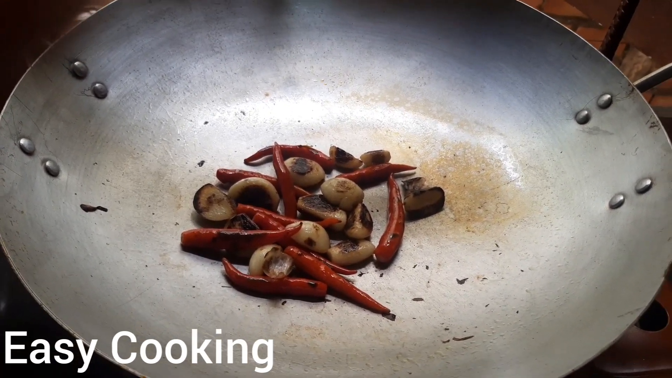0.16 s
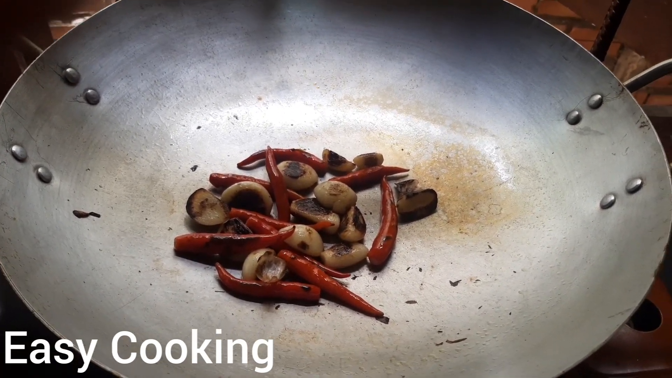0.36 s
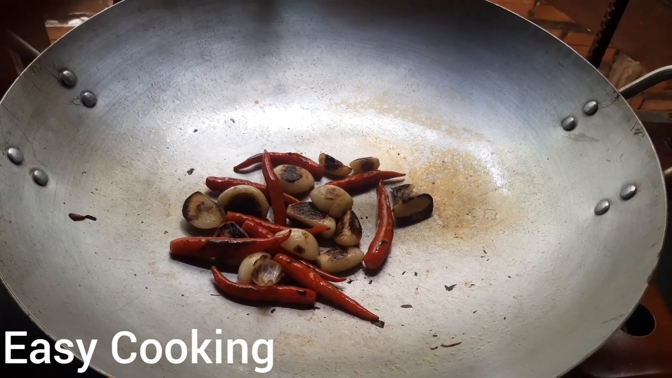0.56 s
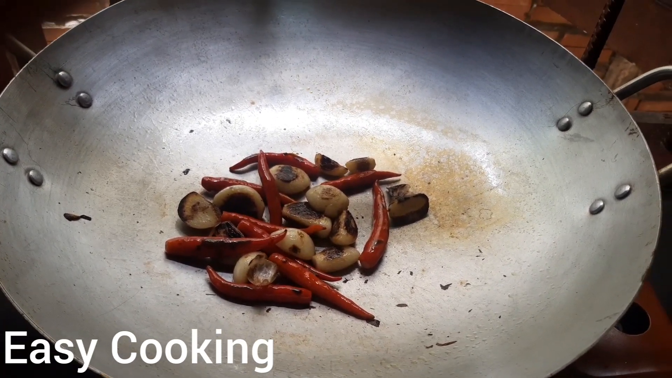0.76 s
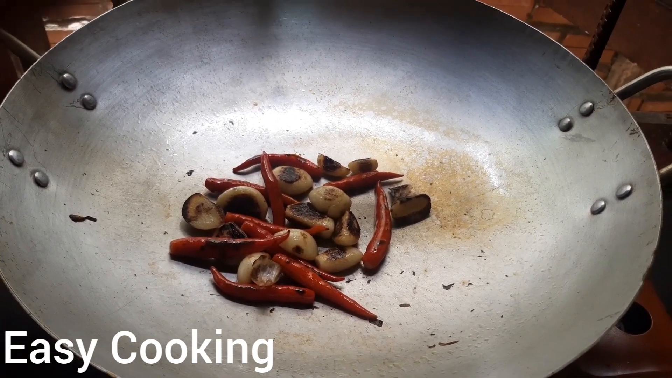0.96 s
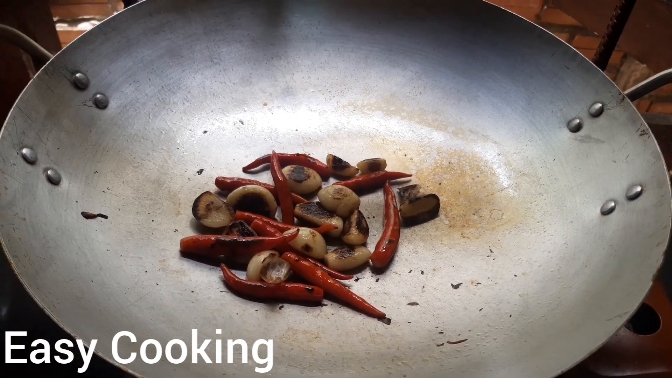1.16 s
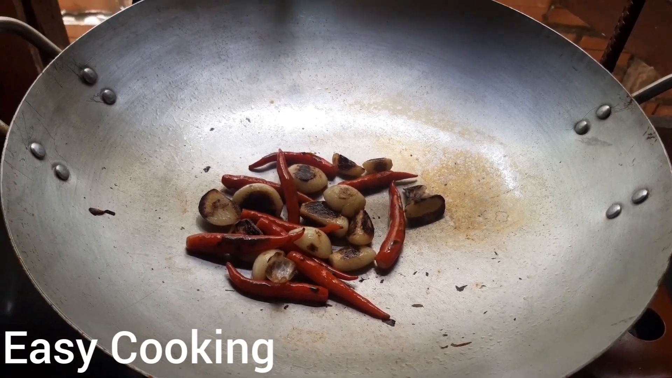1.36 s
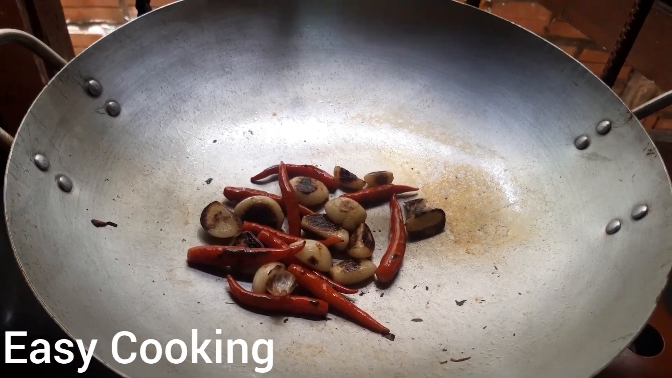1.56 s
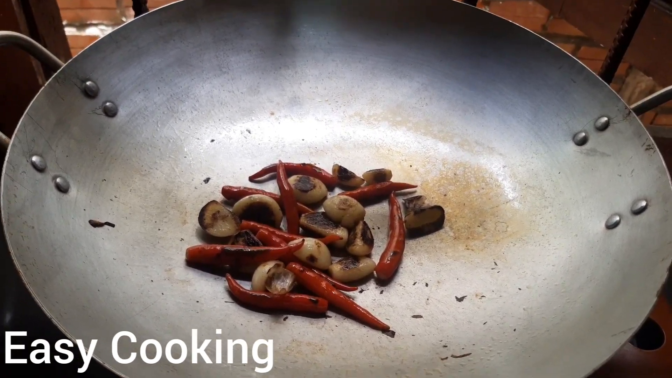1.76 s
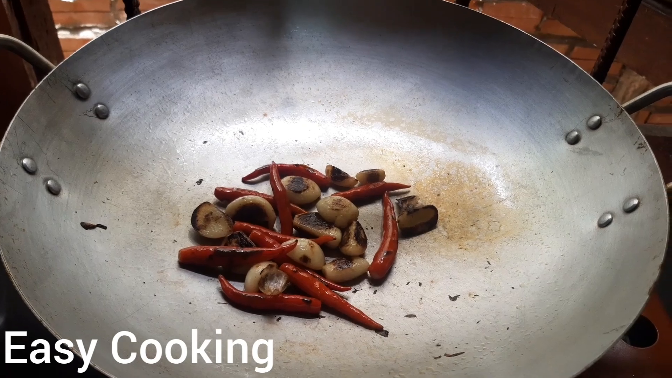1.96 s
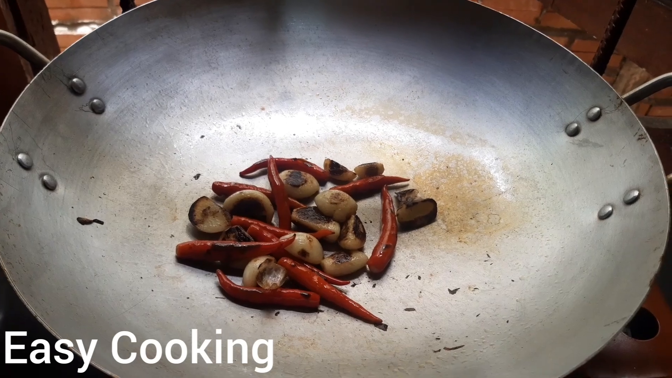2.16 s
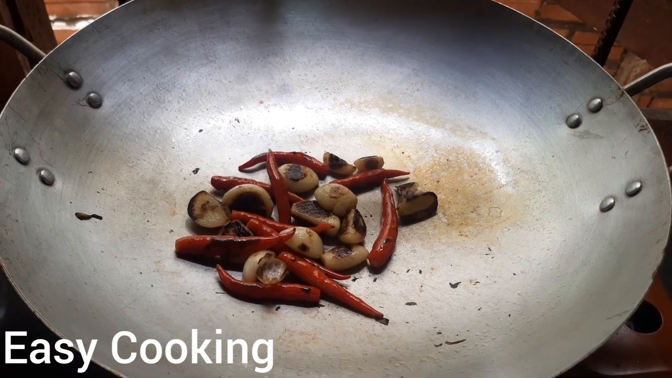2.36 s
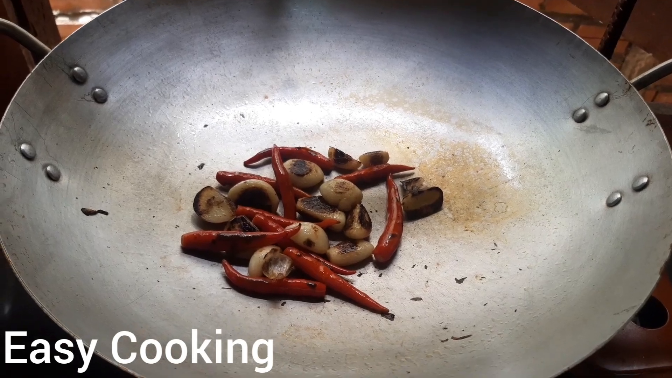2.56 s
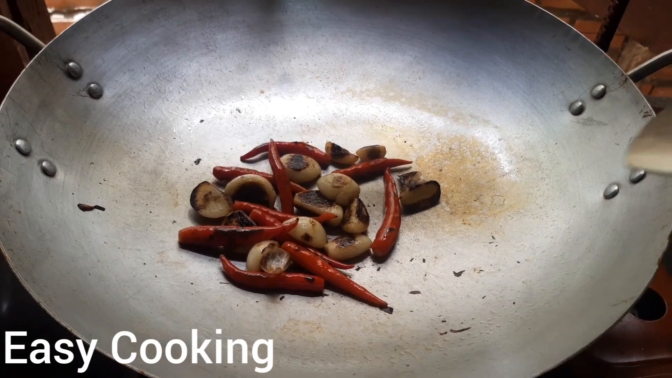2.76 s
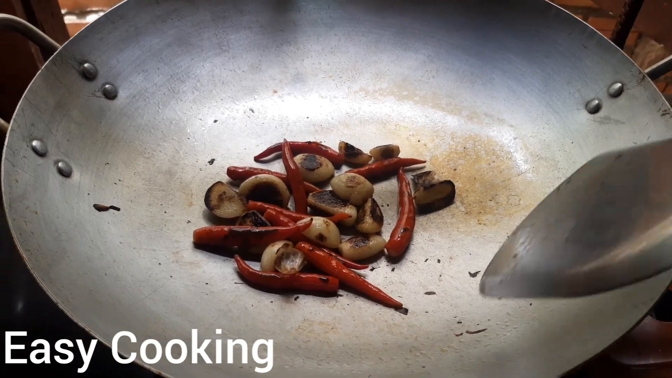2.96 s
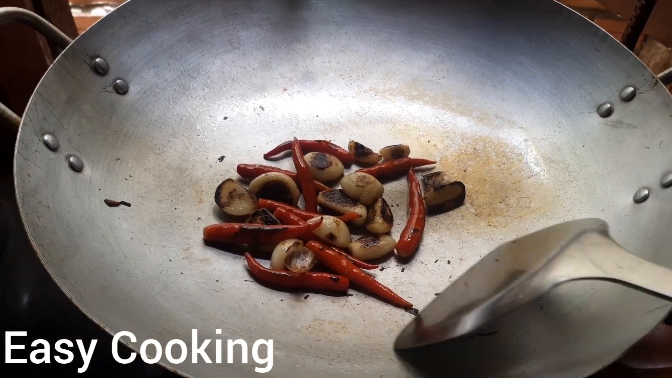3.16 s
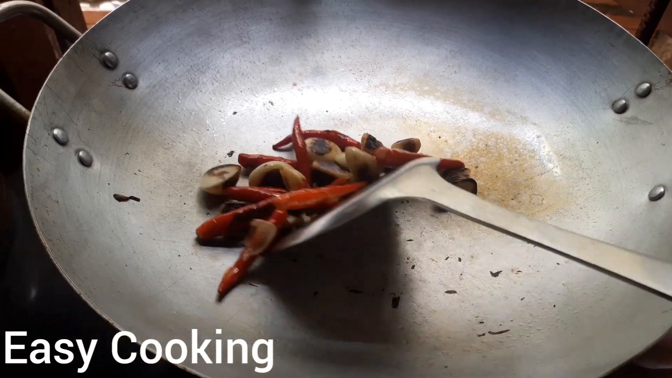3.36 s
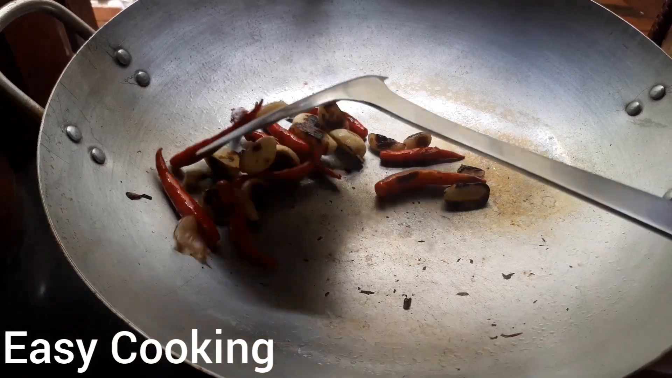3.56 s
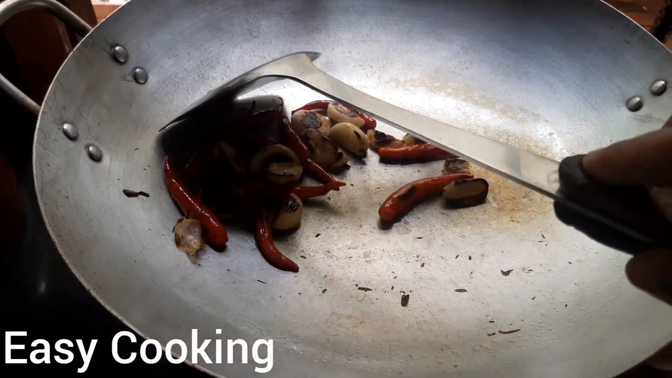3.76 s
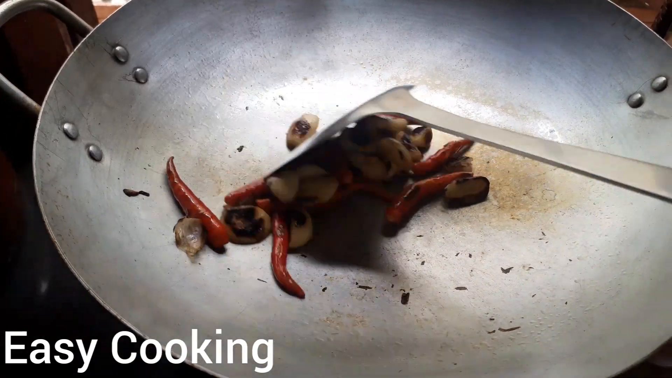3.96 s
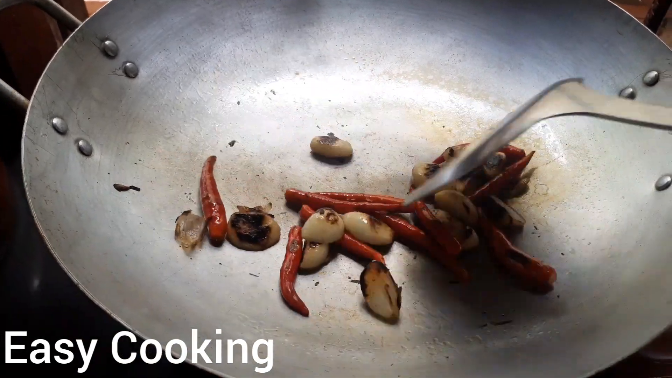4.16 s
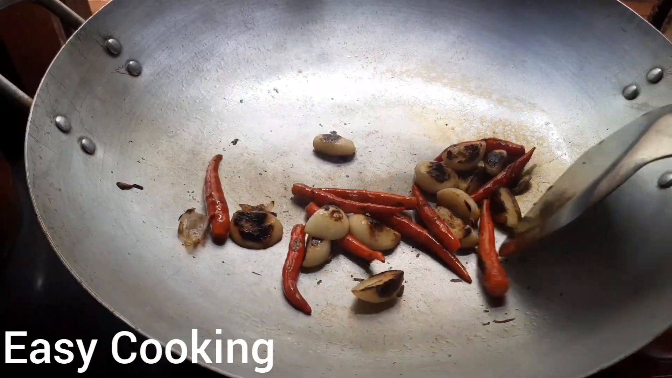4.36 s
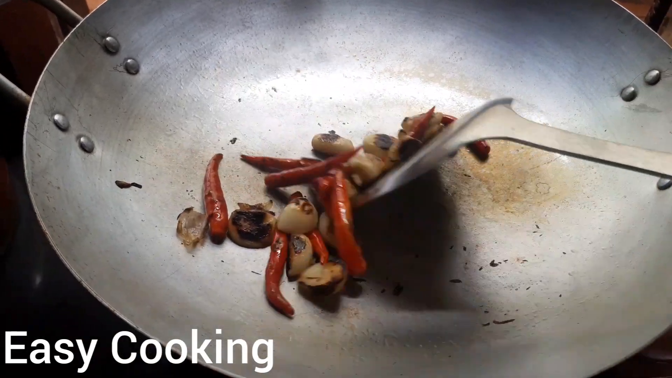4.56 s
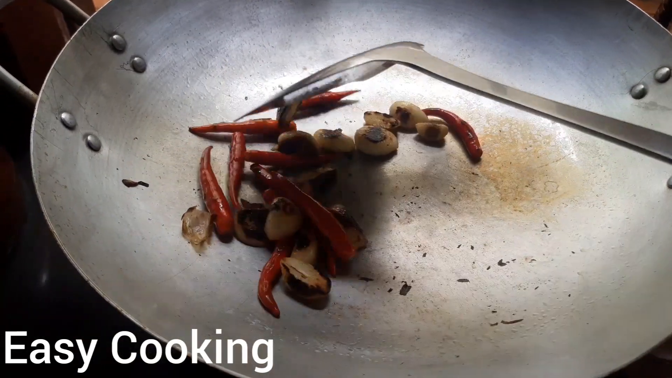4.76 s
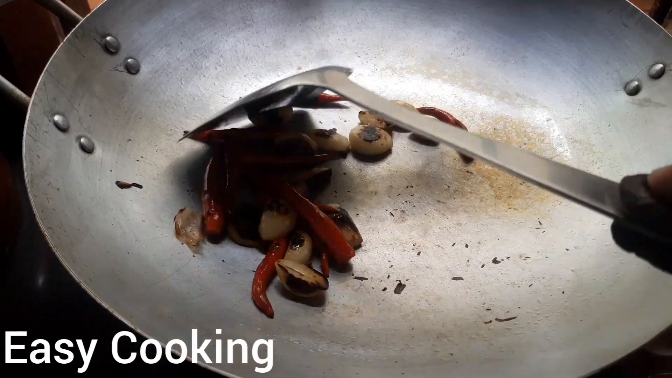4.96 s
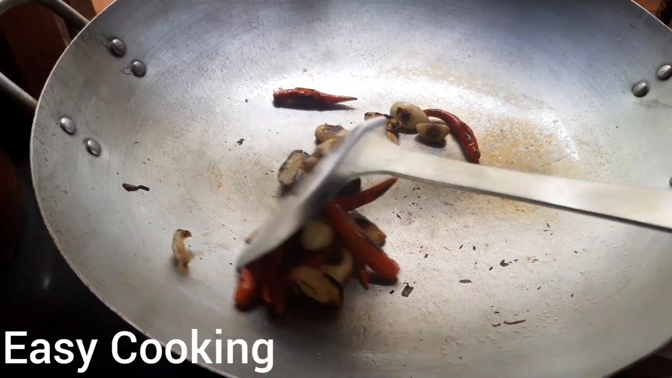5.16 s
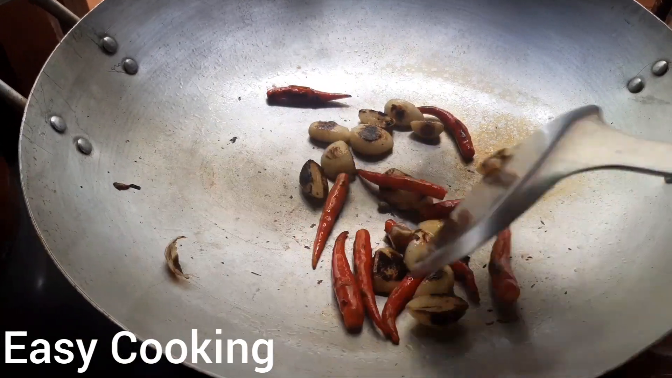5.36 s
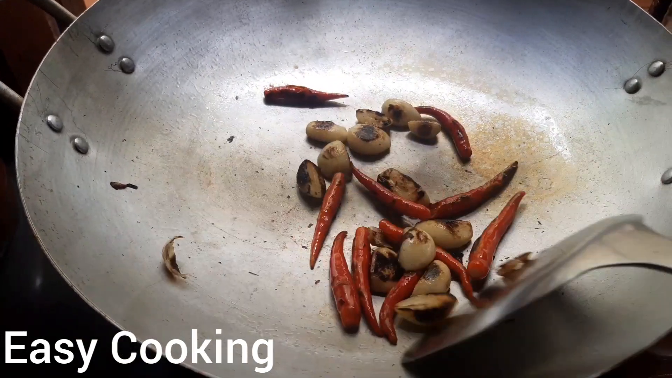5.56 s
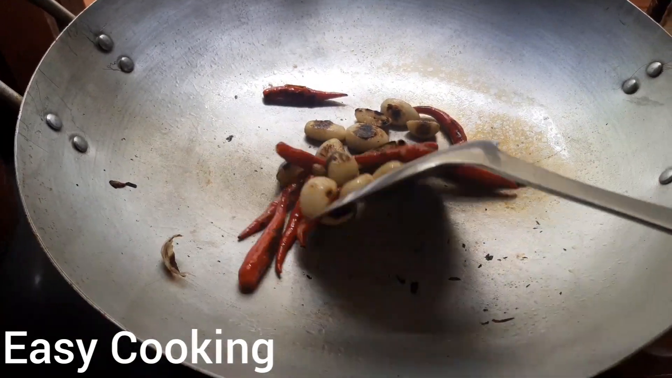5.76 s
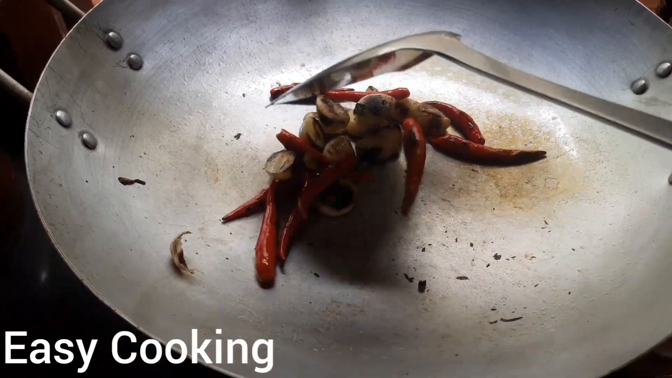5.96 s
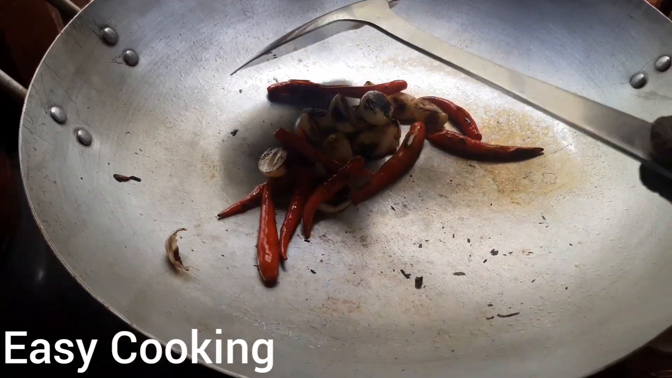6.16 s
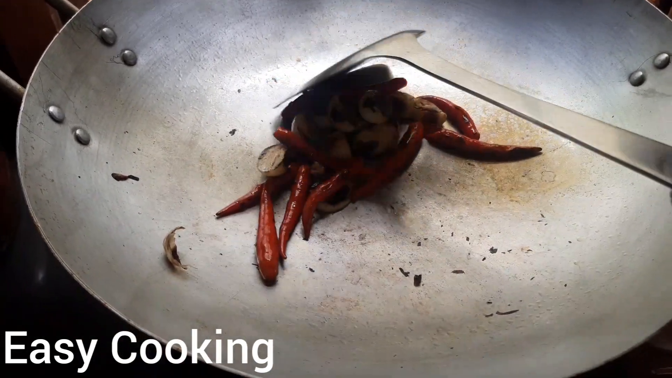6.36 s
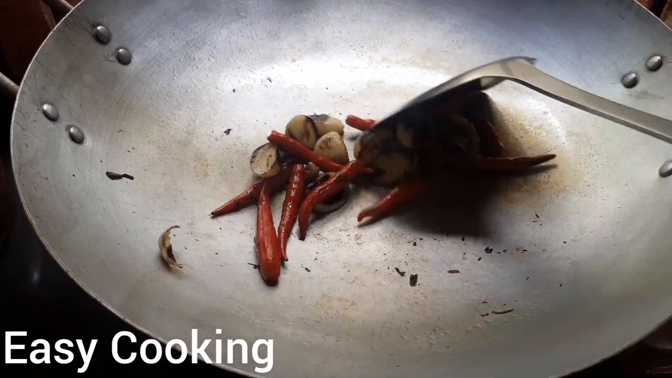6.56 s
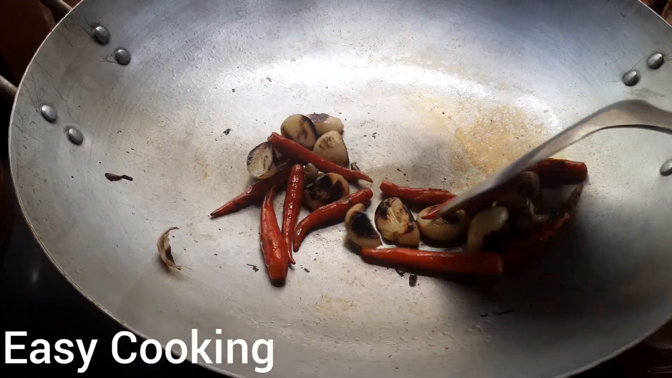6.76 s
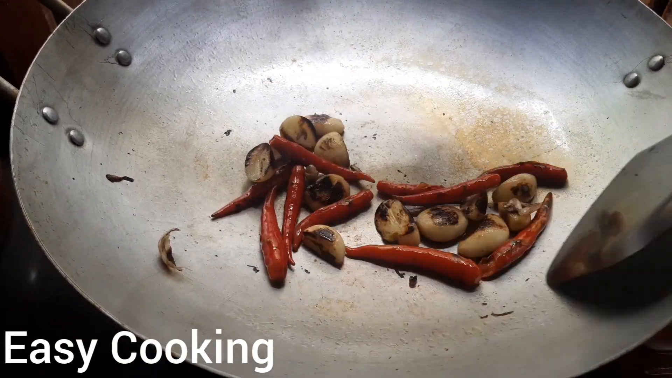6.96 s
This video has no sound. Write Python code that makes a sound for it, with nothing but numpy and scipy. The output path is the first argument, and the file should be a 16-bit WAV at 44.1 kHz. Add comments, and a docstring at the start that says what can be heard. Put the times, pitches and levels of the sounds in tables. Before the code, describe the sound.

In a small kitchen, a quiet pan spits sharply before a metal spatula clangs and rasps through sizzling, softly tumbling food.

```python
"""A metal spatula works in a nearly dry steel wok where chillies and garlic fry, in a small kitchen.
At first the pan only spits now and then (sharp snaps with a fizz) and a utensil clacks (damped modes).
Then the spatula knocks (ringing bowl and steel modes), scrapes (slip clicks through those modes) and
turns the food, which tumbles (soft taps) and sizzles on fresh hot metal (dense random pops).
Faint below: rumble, crackle, a hum that sets in and a distant whir (filtered noise, sines)."""
import sys
import numpy as np
from scipy import signal
from scipy.fft import rfft, irfft
from scipy.io import wavfile

SR = 44100
rng = np.random.default_rng(int(sys.argv[2]) if len(sys.argv) > 2 else 0)


def persist_wave(psi):
    """Save psi, clipped to +-1, as 16-bit WAV."""
    counts = np.round(np.clip(psi, -1, 1) * 32767).astype(np.int16)
    wavfile.write(sys.argv[1], SR, np.atleast_2d(counts).T)


N = 308700
TIME = np.arange(N) / SR
RING_TIME = TIME[:SR // 2]
RING_SIZE = len(RING_TIME)

# slow bending modes of the bowl: f/Hz, level/dB, t60/s
BOWL_MODES = [(235.4, -14.5, 0.63), (285.3, -10.5, 0.32), (379, -43, 0.13), (437.2, -10.5, 0.51),
              (491, -5, 0.081), (543.6, -3, 0.3), (559, -8.5, 0.34), (699.3, 0.5, 0.093), (773.5, -5, 0.14),
              (807, -19, 0.12), (922, -14, 0.45), (1070, -31, 0.16)]
# spectrum of tiny bursts on hot steel: f/Hz, density/dB per Hz
FIZZ_SPECTRUM = [(200, -13.5), (600, -7.5), (1500, -6.5), (3000, -3), (5000, -4.5), (8000, -1.5),
                 (10000, -0.5), (13000, 2.5), (16000, -1)]
# blade pushed along the steel: start/s, length/s, friction drive/dB, swell over stroke/dB,
# blade resonance at mid-stroke/Hz, drive of food shoved along/dB
STROKES = [(3.063, 0.19, -29, 5, 2950, -32.5), (3.242, 0.071, -22.5, 0, 2770, -28),
           (3.584, 0.033, -32, -3, 2870, -44), (3.86, .15, -30.5, 3.5, 2800, -29),
           (4.17, .08, -30, -1, 2600, -35), (4.298, .1, -40.5, 11, 2700, -40),
           (4.449, .16, -27, -5.5, 2620, -32), (4.92, 0.14, -44, 1, 2620, -60),
           (5.167, 0.065, -38.5, 7, 2680, -42.5), (5.57, 0.058, -31.5, -0.5, 2500, -35.5),
           (5.674, 0.051, -26.5, 2, 2600, -36), (5.926, 0.033, -36, -1, 2900, -40),
           (6.332, 0.12, -34, -1.5, 2850, -32), (6.554, .08, -32.5, -7, 2720, -35),
           (6.803, 0.076, -37, 3, 2750, -49), (6.95, .06, -39, -3, 2740, -29)]
# moist food turned onto hot steel: start/s, spreading time/s, sizzle/dB, time to dry by 20 dB/s,
# tilt/dB (added to the finest fizz, taken from the rest)
TURNS = [(3.1, 0.074, -30, .4, -3), (3.24, 0.036, -28.5, 0.18, 4), (3.43, 0.025, -31.5, 0.56, -2.5),
         (3.549, 0.03, -20, 0.09, -0.5), (3.85, 0.037, -34, 1, -1), (3.915, 0.029, -21.5, 0.64, -1),
         (4.039, 0.028, -20.5, 0.56, -1.5), (4.14, 0.078, -16, 0.23, 0.5), (4.29, 0.056, -25.5, 1.1, -1),
         (4.451, 0.024, -20, 0.45, 3.5), (4.53, 0.032, -21.5, 0.22, 0.5), (4.84, .08, -39, 7, 0),
         (5.08, 0.024, -23, 0.2, -0.5), (5.19, 0.045, -26.5, 0.53, -3), (5.309, 0.043, -20.5, 0.07, -1),
         (5.57, 0.054, -31.5, .5, 1), (5.66, 0.046, -25.5, 0.38, -1.5), (5.909, 0.016, -29.5, .4, 0),
         (6.33, 0.058, -33.5, 0.54, -3.5), (6.539, 0.022, -25, 0.46, 0), (6.789, 0.054, -24.5, 0.3, 0),
         (6.93, .06, -30, .4, -2)]


def from_db(db):
    """Decibels to gain."""
    return 10 ** (np.asarray(db) / 20)


def rms_one(x):
    """Scale to unit power."""
    return x / np.sqrt(np.mean(x ** 2) + 1e-20)


def attack_one(x):
    """Scale a ring to unit power over its first 20 ms."""
    return x / np.sqrt(np.mean(x[..., :SR // 50] ** 2))


def energy_one(x):
    """Scale a ring so that it passes white noise at equal power."""
    return x / np.sqrt(np.mean(np.sum(x ** 2, axis=-1)))


def dying(t60_s):
    """Exponential decay, 60 dB in t60_s."""
    return from_db(-60 * RING_TIME / t60_s)


def pan(left_db):
    """Channel gains for a left-minus-right level."""
    return from_db(np.array([[.5], [-.5]]) * left_db)


def cut(x, hz, kind):
    """Second-order low- or high-pass."""
    sos = signal.butter(2, hz, kind, fs=SR, output="sos")
    return signal.sosfilt(sos, x + 1e-18)


def colour(x, spectrum):
    """Weight a signal by a spectrum, interpolated in dB over log frequency; high-pass below it."""
    hz, db = np.transpose(spectrum)
    size = x.shape[-1]
    bins_hz = np.fft.rfftfreq(size, 1 / SR) + 1  # +1 avoids log(0)
    gain = from_db(np.interp(np.log(bins_hz), np.log(hz), db))
    return cut(irfft(rfft(x) * gain, size), hz[0] / 2, "high")


def drift(rate_hz):
    """Interpolated random values, rate_hz new ones per second, unit power."""
    return rms_one(np.interp(TIME * rate_hz, np.arange(N), rng.standard_normal(N)))


def stereo_noise(size, alike):
    """White noise; the channels share the fraction alike of their power."""
    white = rng.standard_normal((3, size))
    return np.sqrt(alike) * white[0] + np.sqrt(1 - alike) * white[1:]


def grains(per_s, spread_db):
    """Random clicks of unequal size and random sign, unit power."""
    sizes = from_db(spread_db * np.minimum(rng.exponential(1, N), 5))
    signs = rng.choice([-1, 1], N)
    return rms_one(sizes * signs * (rng.random(N) < per_s / SR))


def through(x, response):
    """Convolve an excitation with a stereo response."""
    return signal.fftconvolve(np.atleast_2d(x), response, axes=-1)[:, :N]


def add(out, s, sound):
    """Mix a sound in at a time."""
    at = round(s * SR)
    out[:, at:at + sound.shape[-1]] += sound[:, :max(N - at, 0)]


def modes(table, scatter_rad, vary_db, detune):
    """Decaying sines; pitch varies per mode, strength and phase per mode and channel."""
    out = 0
    for hz, db, t60_s in table:
        gain = from_db(db + vary_db * rng.standard_normal((2, 1)))
        shifted_hz = hz * (1 + detune * rng.standard_normal())
        phase = scatter_rad * rng.standard_normal((2, 1))
        out = out + gain * dying(t60_s) * np.sin(2 * np.pi * shifted_hz * RING_TIME + phase)
    return out


def summed_db(envelopes, levels_db):
    """Level of overlapping sounds, whose powers add."""
    power = sum((from_db(db) * envelope) ** 2 for envelope, db in zip(envelopes, levels_db))
    return 10 * np.log10(power + 1e-12)


def whir():
    """Faint distant whir: narrow noise shifted to a gliding pitch, with airy hiss above it."""
    # t/s, f/Hz, level/dB (before the tone and hiss gains)
    glide = [(1.4, 840, -60.5), (2.1, 874, -56), (2.42, 910, -58), (2.55, 950, -52), (2.69, 1030, -51),
             (2.77, 1000, -50), (2.86, 990, -53.5), (3.05, 875, -52.5), (3.4, 870, -85)]
    s, hz, db = np.transpose(glide)
    turn = np.exp(2j * np.pi * np.cumsum(np.interp(TIME, s, hz)) / SR)
    tone = rms_one((cut(stereo_noise(N, 0.25) / turn, 37, "low") * turn).real)
    hiss = cut(stereo_noise(N, 0.086), 2700, "high")
    hiss = rms_one(cut(cut(hiss, 2600, "low"), 3100, "low"))
    mix = from_db(-4.0) * tone * pan(-1.5) + from_db(-3) * hiss
    return mix * from_db(np.interp(TIME, s, db))


def background():
    """Coloured noise for air and low rumble, sparse clicks for steady faint frying, a hum, a whir."""
    # room noise: f/Hz, density/dB per Hz
    kitchen = [(15, -49), (25, -52), (53, 0.5), (92, -3.5), (153, -5.5), (217, -9.5), (317, -8), (489, -19),
               (545, -9.5), (887, -13.5), (1440, -23.5), (2280, -17.5), (3520, -22), (13200, -19),
               (16000, -17)]
    # low hum partials: f/Hz, level/dB
    hum_partials = [(156, -60), (312, -65)]
    hum_start_s = 2.02
    air = cut(rms_one(colour(stereo_noise(N, 0.097), kitchen)), 840, "high")
    rumble = cut(rms_one(colour(stereo_noise(N, 0.79), kitchen)), 1100, "low")
    clicks = np.array([grains(per_s=150, spread_db=-0.5) for side in range(2)])
    crackle = cut(clicks, 2200, "high")
    hum = sum(from_db(db + 2 * drift(8)) * np.sin(2 * np.pi * hz * TIME) for hz, db in hum_partials)
    hum = hum * np.clip((TIME - hum_start_s) * 100, 0, 1)  # sets in over 10 ms
    low = (from_db(-50.5) * rumble + hum) * pan(-7.0)
    return from_db(-47.5) * air * pan(-1.3) + low + from_db(-62) * crackle + whir()


def fizz_burst(t60_s):
    """A bright, grainy noise burst that dies quickly."""
    grit = from_db(6.5 * np.clip(rng.standard_normal(RING_SIZE), -2, 2))
    gritty = stereo_noise(RING_SIZE, 0.39) * grit
    return attack_one(colour(gritty, FIZZ_SPECTRUM) * dying(t60_s)) * pan(-1.2)


def small_spits(peak_db, fizz_db, vary_db, within_s):
    """Each turn throws off a smaller droplet, loud in step with its sizzle: t/s, peak/dB, fizz/dB."""
    rows = []
    for start_s, spread_s, heat_db, _, _ in TURNS:
        when, size = rng.random(2)
        level_db = heat_db - vary_db * size
        rows.append((start_s + spread_s + within_s * when, level_db + peak_db, level_db + fizz_db))
    return rows


def spits():
    """A droplet bursts with one sharp snap, which pings the steel, and boils away."""
    # large drops of hot oil: t/s, peak/dB, fizz after it/dB
    large_spits = [(0.2350, -16.5, -35.5), (0.4055, -10, -33), (0.4350, -25, -45), (0.481, -6, -35),
                   (0.644, -33, -50), (1.3579, -9.5, -35), (3.4394, -14, -34), (4.7190, -16, -25),
                   (4.9002, -15, -36), (5.2324, -10, -20.5), (5.4225, -14.5, -33.5), (5.5093, -18, -32.5),
                   (5.6515, -20, -24.5), (5.8383, -9, -33.5), (5.9401, -7, -32), (5.9598, -4.5, -34),
                   (6.035, -9, -36), (6.201, -13.5, -32.5), (6.4759, -14, -38), (6.5282, -14, -33),
                   (6.8292, -9.5, -34)]
    small = small_spits(peak_db=10, fizz_db=-17, vary_db=10, within_s=.18)
    out = np.zeros((2, N))
    for s, peak_db, fizz_db in list(large_spits) + small:
        echoes = from_db(-22.0) * stereo_noise(RING_SIZE, 0.078) * dying(0.0054)
        ping = from_db(-19.0) * cut(stereo_noise(RING_SIZE, 0.69), 2400, "low") * dying(0.029)
        snap = cut(dying(.0002) + echoes + ping, 900, "high")
        snap = snap / np.abs(snap).max(axis=1).mean() * pan(-1.8)
        add(out, s, from_db(peak_db) * snap + from_db(fizz_db) * fizz_burst(t60_s=0.13))
    return out


def clack_touches():
    """Each clack, then three dull touches as the utensil rocks to rest: t/s, level/dB, cut-off/Hz."""
    # utensil handled beside the stove: t/s, level/dB, brightness cut-off/Hz, rattle after it/dB
    handled = [(0.395, -47, 3000, -63), (0.4773, -26, 8000, -40.5), (0.5711, -36.5, 2960, -67),
               (0.9713, -30.5, 8900, -47), (1.744, -41, 3460, -51), (1.760, -40, 3500, -44),
               (1.9225, -49, 2520, -56), (2.0154, -44, 2060, -58)]
    gap_s, rattle_hz = .024, 2500
    for s, level_db, bright_hz, rattle_db in handled:
        yield s, level_db, bright_hz
        for k in range(3):
            yield s + gap_s * (k + 1 + rng.uniform(-.2, .2)), rattle_db, rattle_hz


def clacks():
    """One hard, well damped object: noise and modes, low-passed to suit the force of each touch."""
    # dense part of the utensil's sound: f/Hz, density/dB per Hz
    utensil_spectrum = [(100, -11), (300, -5), (700, 4), (1500, -0.5), (2600, 0), (3600, -5), (4600, -8.5),
                        (6200, -8), (16000, -9.5)]
    # its clear modes: f/Hz, level/dB, t60/s
    utensil_modes = [(583, -15, 0.31), (1077, -8, 0.16), (1467, 4, 0.065), (1710, 3.5, 0.035),
                     (2113, -2, 0.092), (2540, -6, 0.056), (3580, 2.5, 0.056), (5460, -3, .06),
                     (6680, 4, 0.049), (8300, 1, 0.066)]
    out = np.zeros((2, N))
    for s, level_db, bright_hz in clack_touches():
        decay = dying(0.081) + from_db(-14) * dying(0.41)
        rattle = colour(stereo_noise(RING_SIZE, 0.6), utensil_spectrum) * decay
        clear = modes(utensil_modes, scatter_rad=3.56, vary_db=1, detune=0.0093)
        body = attack_one(rattle) + from_db(1) * attack_one(clear)
        add(out, s, from_db(level_db) * attack_one(cut(body, bright_hz, "low")) * pan(-4.0))
    return out


def bowl_ring(centre_hz, ring_db):
    """The bowl flexes in one short thump and its low modes sing on; the spot struck favours one range."""
    thump = np.sin(2 * np.pi * centre_hz * RING_TIME) * dying(0.011)
    rattle = cut(cut(stereo_noise(RING_SIZE, 0.71), 740, "low"), 225, "high")
    rattle = attack_one(rattle * dying(0.3))
    singing = modes(BOWL_MODES, scatter_rad=0.56, vary_db=3.3, detune=0.01)
    flex = from_db(11.5) * thump + from_db(ring_db) * (singing + from_db(-2.5) * rattle)
    band_hz = [centre_hz / 1.46, centre_hz * 1.37]
    favoured = signal.butter(1, band_hz, "band", fs=SR, output="sos")
    return signal.sosfilt(favoured, cut(flex, 215, "high")) * pan(-4.5)


def steel_ring(clear_db):
    """A few clear high modes over a thicket of close ones; clear_db is lower under a sliding blade."""
    # clear modes of wok and blade: f/Hz, level/dB, t60/s
    clear_modes = [(1245, -11, 0.14), (1320, -2, 0.094), (1750, -5, 0.2), (2000, -1.5, 0.1),
                   (2310, 2.5, 0.045), (2550, 0.5, 0.13), (2762, 4, 0.12), (2763, -3.5, 0.16),
                   (3050, 0.5, 0.12), (3400, -3.5, 0.13), (4004, 1.5, 0.14), (4310, -2.5, 0.14),
                   (5010, -3.5, 0.17), (5845, -9, 0.16), (7300, -9, 0.14), (8460, 2, 0.033)]
    # thicket of close modes: f/Hz, density/dB per Hz
    dense_spectrum = [(300, -13.5), (900, -1.5), (1500, -4.5), (2100, -0.5), (2800, 1), (4000, 0),
                      (5200, -4.5), (8000, -4.5), (16000, -45)]
    decay = dying(0.19) + from_db(-1.5) * dying(0.029)
    thicket = colour(stereo_noise(RING_SIZE, 0.44), dense_spectrum) * decay
    clear = modes(clear_modes, scatter_rad=2.38, vary_db=2.5, detune=0.0153)
    return attack_one(thicket) * pan(-3.6) + from_db(clear_db) * attack_one(clear)


def knocks():
    """Flat blows boom, edge blows clang and tick; the springy blade touches once more after each."""
    # spatula strikes the wok: t/s, bowl boom/dB, boom centre/Hz, after-ring in the boom/dB,
    # steel clang/dB, edge tick/dB
    blows = [(3.0635, -23, 554, 1, -22, -21), (3.5767, -35.5, 524, -6, -57, -33),
             (3.7716, -13, 636, 5, -27.5, -54), (3.8270, -28.5, 580, -2, -43, -56),
             (3.8520, -21, 615, 3, -37.5, -39.5), (4.4112, -18, 597, -10.5, -21, -36),
             (4.8680, -41, 530, -6, -54, -37.5), (5.54, -21.5, 510, 1, -19.5, -22.5),
             (5.5650, -34.5, 300, 6.5, -28.5, -48), (6.3033, -17.5, 596, -3.5, -17.5, -26),
             (6.374, -33, 493, -9, -48, -48), (6.5590, -28.5, 610, 6.5, -32.5, -42),
             (6.6680, -39.5, 600, -12, -34.5, -35), (6.778, -32.5, 484, -5, -38.5, -49),
             (6.9263, -21.5, 492, -6.5, -17, -19)]
    rebound_s, rebound_db = 0.0074, -12.5
    out = np.zeros((2, N))
    for s, boom_db, boom_hz, ring_db, clang_db, tick_db in blows:
        for delay_s, touch_db in ((0, 0), (rebound_s, rebound_db)):
            boom = from_db(boom_db) * attack_one(bowl_ring(boom_hz, ring_db))
            clang = from_db(clang_db) * attack_one(steel_ring(clear_db=3))
            tick = from_db(tick_db) * fizz_burst(t60_s=0.11)
            add(out, s + delay_s, from_db(touch_db) * (boom + clang + tick))
    return out


def stroke_envelope(start_s, length_s, swell_db):
    """The blade grips, is pressed harder or eased along its way, and lifts."""
    grip_s, lift_db_per_s = 0.023, 286
    along = np.clip((TIME - start_s) / length_s, 0, 1)
    lifted_s = np.maximum(TIME - start_s - length_s, 0)
    grip = np.clip((TIME - start_s) / grip_s, 0, 1)
    return grip * from_db(swell_db * (along - .5) - lift_db_per_s * lifted_s)


def scrape(friction_db):
    """The blade catches and slips on the damped steel; as it travels, the mix of modes changes."""
    spots = 5
    slips = grains(per_s=2200, spread_db=2.5) * from_db(friction_db + 2 * drift(70))
    travel = np.cumsum(np.abs(drift(5))) * 14 / SR  # in spots
    out = 0
    for spot in range(spots):
        near = np.clip(1 - np.abs((travel - spot) % spots - 1), 0, 1)
        response = energy_one(steel_ring(clear_db=-2) * dying(0.18))
        out = out + through(slips * np.sqrt(near), response)
    return out


def blade_hz():
    """Each stroke sets the blade at a new angle; its resonance sinks as it tilts up the wall."""
    sag_hz_per_s = 500
    ends = []
    for start_s, length_s, _, _, hz, _ in STROKES:
        for end in (0, 1):
            ends.append((start_s + length_s * end, hz - sag_hz_per_s * length_s * (end - .5)))
    return np.interp(TIME, *np.transpose(sorted(ends)))


def blade_rasp(friction_db, half_width_hz):
    """The slips also keep the blade's gliding resonance ringing, with extra force where it catches."""
    # brief catches: t/s, length/s, peak force/dB
    catches = [(4.002, 0.035, -28.5), (5.692, 0.027, -32), (6.387, 0.045, -30), (6.467, 0.028, -34.5)]
    turn = np.exp(2j * np.pi * np.cumsum(blade_hz()) / SR)
    per_side = np.array([grains(per_s=620, spread_db=2) for side in range(2)])
    slips = grains(per_s=910, spread_db=2.5) + per_side
    force = from_db(friction_db - 9)
    for s, length_s, db in catches:
        force = force + from_db(db) * np.interp(TIME, [s, s + length_s / 10, s + length_s], [0, 1, 0])
    ringing = rms_one((cut(slips / turn, half_width_hz, "low") * turn).real)
    return ringing * force * pan(9.3)


def pat(t60_s):
    """The dull, short answer of the bowl to something soft."""
    # f/Hz, density/dB per Hz
    dull_spectrum = [(100, -3), (160, 3.5), (250, -1.5), (450, -3.5), (750, 2), (1100, -8.5), (2000, -10),
                     (8000, -47)]
    thud = colour(stereo_noise(RING_SIZE, 0.62), dull_spectrum) * dying(t60_s)
    return cut(thud, 63, "high") * pan(-14)


def tumbling(shove_db, settle_db):
    """Pieces roll and rub, tapping the bowl softly and keeping it singing; large ones drop onto it."""
    # large pieces land on the steel: t/s, level/dB
    landings = [(3.932, -35), (4.129, -36), (4.195, -30), (4.219, -28), (4.245, -28.5), (5.3409, -29),
                (5.747, -36), (5.960, -37.5), (6.035, -39)]
    damped_db = -6.5  # food under the moving blade thuds less than food that rolls free
    taps = grains(per_s=1500, spread_db=2)
    shoved, settling = from_db(shove_db), from_db(settle_db)
    singing = cut(modes(BOWL_MODES, scatter_rad=.3, vary_db=.5, detune=.002), 300, "high") * pan(-5)
    out = from_db(-6.0) * through(taps * np.hypot(shoved, settling), energy_one(singing))
    thuds = taps * np.hypot(from_db(damped_db) * shoved, settling)
    out += from_db(-8.5) * through(thuds, energy_one(pat(t60_s=0.028)))
    for s, db in landings:
        add(out, s, from_db(db) * attack_one(pat(t60_s=0.022)))
    return out


def turn_envelope(start_s, spread_s, dry_s):
    """Sizzle grows while the food spreads over fresh steel, then dies as that side dries."""
    spreading = np.clip((TIME - start_s) / spread_s, 0, 1)
    return spreading * from_db(-20 * np.maximum(TIME - start_s - spread_s, 0) / dry_s)


def sizzle(coarse_db, fine_db):
    """Moisture bursts on hot steel in countless tiny pops, scattered by the bowl."""
    shared = grains(per_s=2500, spread_db=7.5)
    scattered = np.array([grains(per_s=16000, spread_db=4.5) for side in range(2)])
    fizz = rms_one(colour(scattered + from_db(-8.5) * shared, FIZZ_SPECTRUM))
    fine = signal.sosfiltfilt(signal.butter(2, 10500, "high", fs=SR, output="sos"), fizz)
    mix = fine * from_db(fine_db) + (fizz - fine) * from_db(coarse_db)
    return mix * from_db(1.92 * drift(45)) * pan(-1.8)


def judder(start_s, end_s, from_hz, to_hz, rough, level_db):
    """Pressed hard around the second stroke, the blade sticks and slips almost regularly."""
    rate_hz = np.interp(TIME, [start_s, end_s], [from_hz, to_hz]) * (1 + rough * drift(300))
    slips = np.diff(np.floor(np.cumsum(rate_hz) / SR), prepend=0) * from_db(2.4 * drift(400))
    rasp = through(slips, energy_one(steel_ring(clear_db=-17)))
    rasp = rms_one(cut(cut(rasp, 1200, "low"), 490, "high"))
    swell = np.interp(TIME, [start_s, (start_s + end_s) / 2, end_s], [0, 1, 0])
    return rasp * from_db(level_db) * swell * pan(2.2)


def room(x, t60_s, wet_db):
    """Hard kitchen walls answer after 6 ms; long waves reach both sides alike."""
    white = stereo_noise(RING_SIZE, 0.05)
    bass = signal.sosfiltfilt(signal.butter(2, 700, fs=SR, output="sos"), white)
    tail = cut(white - bass + bass[0], 13200, "low") * dying(t60_s) * (RING_TIME > .006)
    return x + from_db(wet_db) * through(x, energy_one(tail))


def scene():
    """Spatula strokes drive friction and tumbling; each turn of the food sets off a sizzle."""
    settling_db = -15  # sizzling food shifts by itself, this far under its sizzle
    start, length, friction, swell, _, shove = np.transpose(STROKES)
    strokes = [stroke_envelope(*row) for row in zip(start, length, swell)]
    start, spread, heat, dry_s, tilt = np.transpose(TURNS)
    turns = [turn_envelope(*row) for row in zip(start, spread, dry_s)]
    friction_db = summed_db(strokes, friction)
    blade = knocks() + scrape(friction_db - 2.5) + blade_rasp(friction_db, half_width_hz=340)
    blade += judder(start_s=3.26, end_s=3.35, from_hz=440, to_hz=387.4, rough=.05, level_db=-23.5)
    food = tumbling(summed_db(strokes, shove), summed_db(turns, heat + settling_db))
    frying = sizzle(summed_db(turns, heat - tilt), summed_db(turns, heat + tilt)) + spits()
    return room(blade + food + frying + clacks(), t60_s=0.34, wet_db=-13) + background()


def record(dry):
    """Long waves reach the right port a little late; the highest peaks are rounded and the top is cut."""
    left = np.pad(dry[0], (1, 0))[:N]  # one sample late
    right = signal.lfilter([-.6, 1], [1, -.6], dry[1])  # all-pass: lows four samples late
    rounded = 1.2 * np.tanh(np.array([left, right]) / 1.2)
    return signal.sosfilt(signal.ellip(12, .1, 80, 15950, fs=SR, output="sos"), rounded)


dry = scene()
out = record(dry)
persist_wave(out)
```